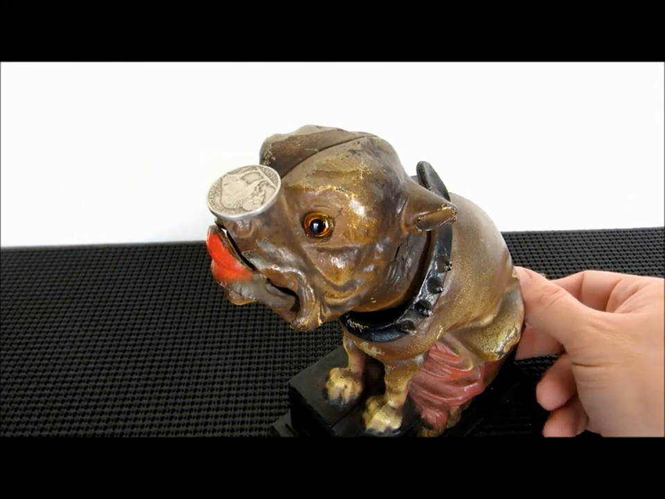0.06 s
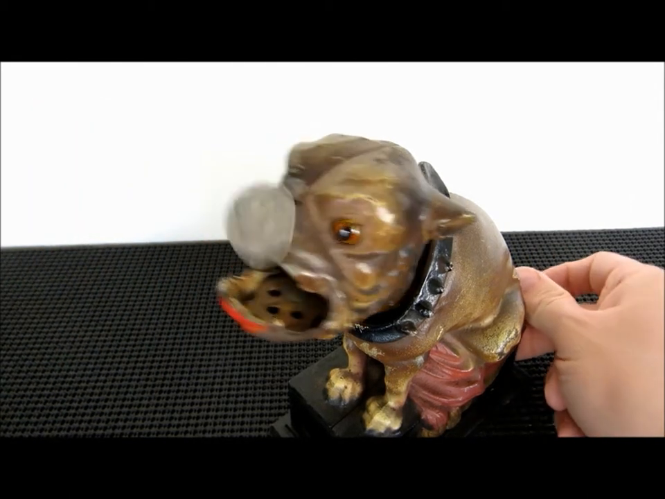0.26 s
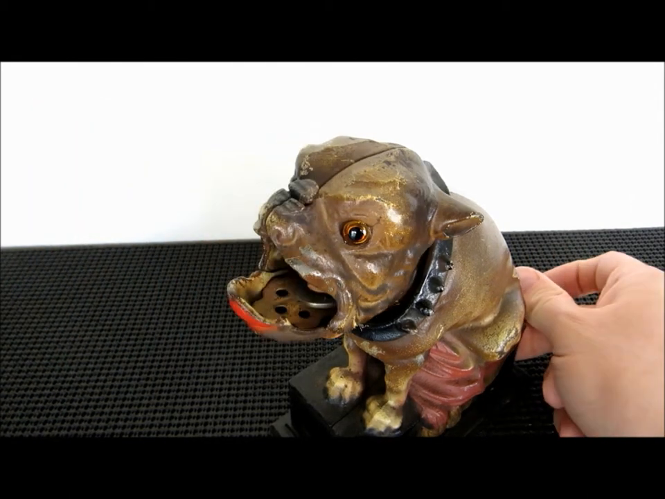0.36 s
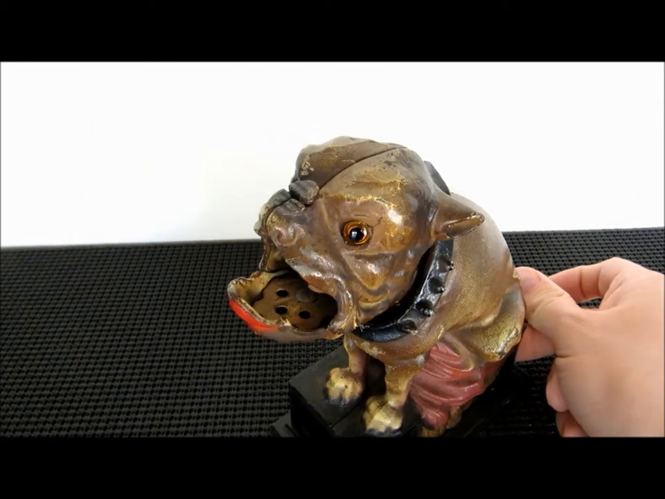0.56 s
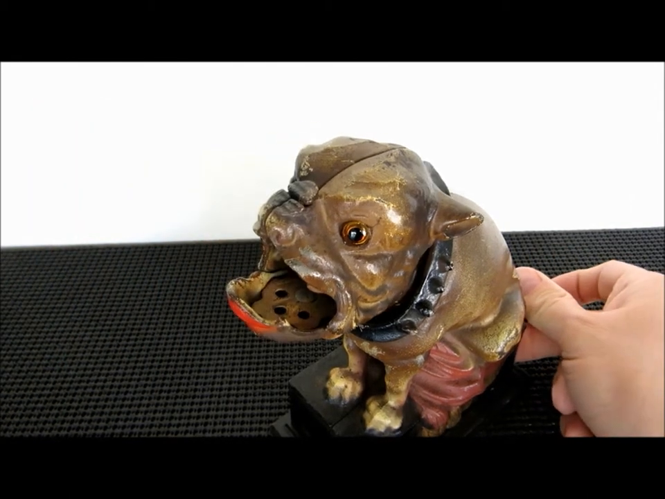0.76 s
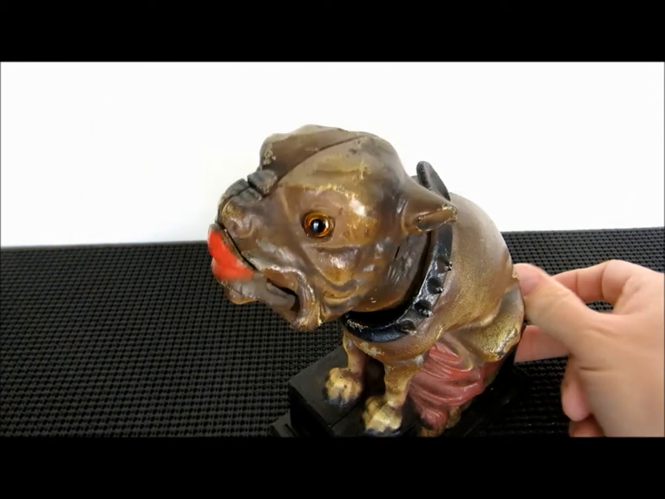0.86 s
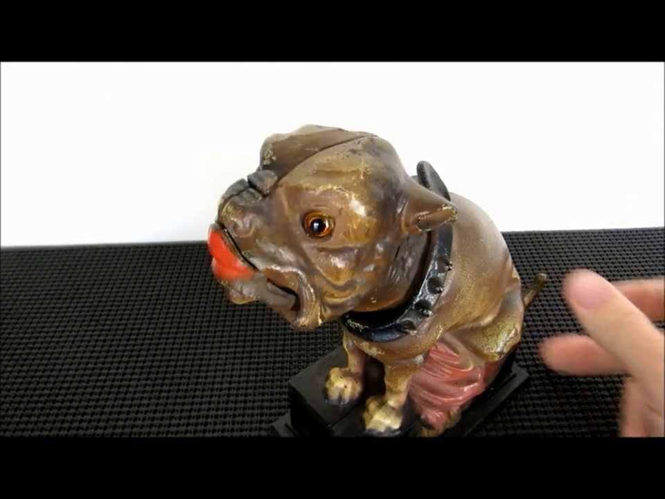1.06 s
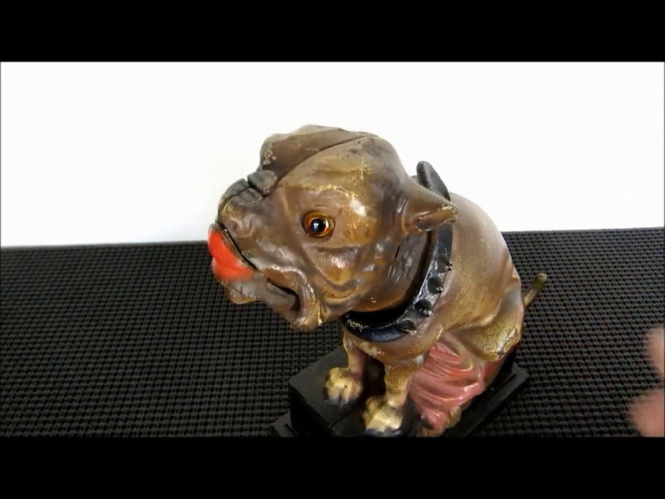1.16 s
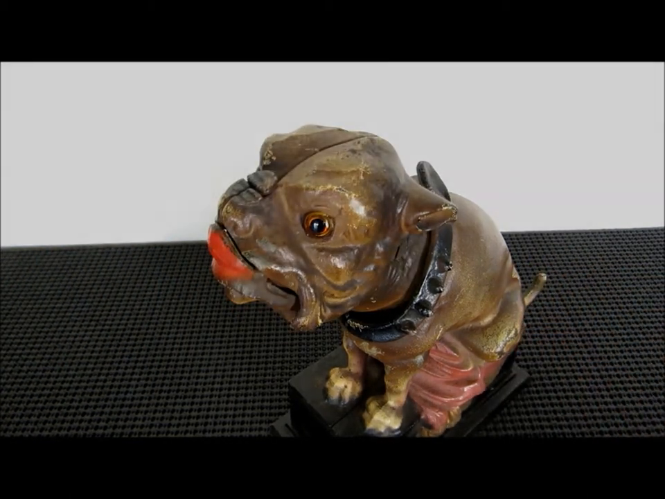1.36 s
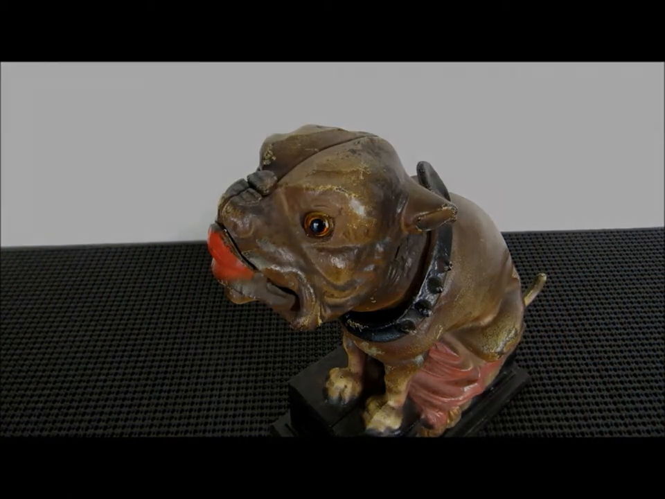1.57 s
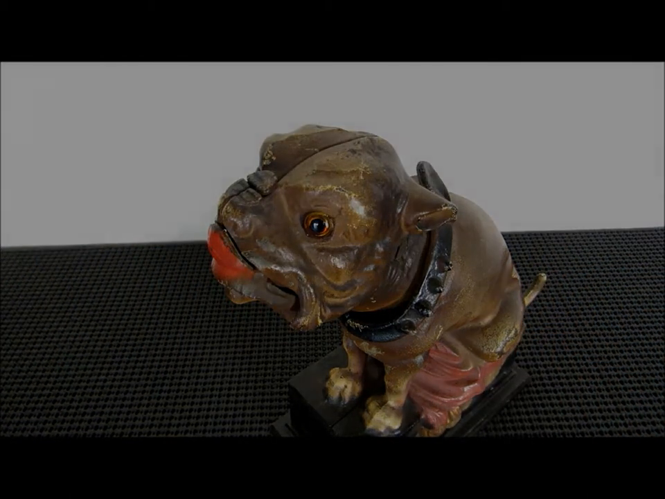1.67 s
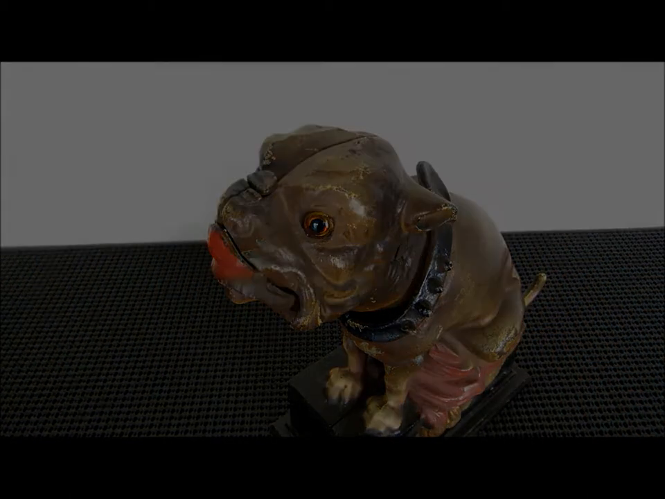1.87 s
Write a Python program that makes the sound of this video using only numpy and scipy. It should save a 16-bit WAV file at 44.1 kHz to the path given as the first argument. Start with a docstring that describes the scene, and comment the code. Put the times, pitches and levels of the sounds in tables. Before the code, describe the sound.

A cast iron toy bank clacks open, a coin clatters inside, and its jaw shuts.

```python
"""A light tap, then the jaw of a cast iron toy bank grinds open and knocks on its stop.
A coin clatters down through the hollow body, and the jaw scrapes shut. Each hit is a short crack
that leaves the iron and the coin ringing; each scrape is a stream of tiny slips.
A hand rustles away. The toy sits on a mat in a small room, close to a stereo microphone,
over a faint hiss and an electrical whine."""
import sys
import numpy as np
from scipy import signal
from scipy.fft import irfft
from scipy.io import wavfile

SR = 44100
rng = np.random.default_rng(int(sys.argv[2]) if len(sys.argv) > 2 else 0)


def master_out(mix):
    """Clip the mix to full scale and print it as 16-bit PCM to the path in sys.argv[1]."""
    frames = np.transpose(np.atleast_2d(mix))
    ceiling = np.clip(frames, -1, 1)
    pcm = np.round(ceiling * 32767).astype(np.int16)
    wavfile.write(sys.argv[1], SR, pcm)


N = 83790
TIME = np.arange(N) / SR

# Five pitch bands, bass to treble. Each row: low edge in Hz, high edge in Hz.
BANDS = [(150, 600), (600, 1600), (1600, 4500), (4500, 9000), (9000, 17000)]
# Jaw and lever knocks. Each row: start in seconds, fade time in seconds, five band levels in dB.
JAW_KNOCKS = [(0.122, 0.0057, -65, -46, -52.5, -57.5, -59), (0.228, 0.004, -60.5, -41.5, -37.5, -49.5, -62),
              (0.2328, 0.007, -49.5, -25.5, -23.5, -32.5, -56), (0.2552, 0.0035, -62, -25, -41, -38, -42),
              (0.2649, 0.0047, -61, -35.5, -26, -31, -40.5), (0.2696, 0.0046, -65.5, -27, -19, -31.5, -37),
              (0.3, 0.0076, -53.5, -34, -25, -26.5, -29.5), (0.305, 0.0063, -50, -25, -24.5, -23.5, -43.5),
              (0.3165, 0.01, -38.5, -32, -27.5, -26.5, -32.5),
              (0.3461, 0.0057, -33, -28.5, -34, -32, -46.5), (0.3678, 0.0043, -29, -21.5, -36, -47, -45),
              (0.8757, 0.02, -57, -34, -35, -31.5, -36.5), (0.899, 0.009, -51, -34.5, -29.5, -46, -55),
              (0.9216, 0.0069, -52.5, -30, -22.5, -24, -28), (0.9661, 0.0079, -67, -80, -36, -36.5, -47)]
# The coin hits the iron. Each row: start in seconds, fade time in seconds,
# main ringing pitch in Hz, its level in dB, five band levels in dB.
COIN_HITS = [(0.384, 0.0025, 5490, -12, -58, -43.5, -35, -18, -25.5),
             (0.3873, 0.0032, 7330, -12.5, -55, -48.5, -39, -18.5, -24.5),
             (0.3957, 0.0092, 5440, -21, -53, -53, -31.5, -43, -31.5),
             (0.409, 0.0083, 5370, -23, -57, -49.5, -34, -32, -33.5),
             (0.435, 0.0017, 5440, -27, -65, -46, -38.5, -46.5, -45),
             (0.4454, 0.0013, 5650, -41, -60, -53, -36.5, -27.5, -39),
             (0.453, 0.0052, 5600, -15.5, -60, -45.5, -38.5, -26, -27),
             (0.4816, 0.0039, 7870, -23, -50, -63, -43.5, -25.5, -27),
             (0.4928, 0.0027, 8000, -23, -52.5, -42, -28.5, -25, -38),
             (0.539, 0.0024, 7970, -27.5, -48, -39, -36, -53.5, -45.5),
             (0.573, 0.0037, 6000, -21.5, -51, -46.5, -32, -25, -32.5),
             (0.579, 0.0073, 8190, -20, -53.5, -36, -36, -26, -28.5),
             (0.61, 0.0055, 3743, -29, -58, -38, -43, -34.5, -40.5),
             (0.621, 0.0053, 3620, -36, -74.5, -44.5, -35.5, -26, -30.5),
             (0.6394, 0.0098, 7650, -30.5, -61.5, -44, -34.5, -30.5, -33.5),
             (0.7152, 0.002, 3954, -15, -37.5, -37, -17.5, -13.5, -26),
             (0.7385, 0.0067, 5810, -14, -60, -46, -34, -23, -26.5),
             (0.754, 0.0064, 7180, -25, -66.5, -52.5, -39, -29, -33.5),
             (0.7754, 0.0055, 5850, -20, -62, -55, -52, -33, -30.5),
             (0.8101, 0.0051, 6130, -15.5, -45.5, -37.5, -23, -15.5, -21.5),
             (0.8612, 0.014, 7140, -24, -52.5, -43, -36, -32, -29.5)]
# The notes each object rings with. Each row: pitch in Hz, level in dB compared with the hit.
BODY_NOTES = [(280, -9), (443, -15), (741, -17), (780, -18), (1108, -15), (1189, -21), (1844, -21),
              (2116, -22), (2308, -19), (2808, -25), (3424, -27), (3666, -20), (3968, -24), (4354, -22),
              (5965, -23), (6973, -24), (7219, -24)]
COIN_NOTES = [(5432, -26), (5652, -26), (5823, -24), (9010, -20), (11590, -22)]
# Hums after heavy hits. Each row: start in seconds, pitch in Hz, level in dB, ring time in seconds.
# A ring time is how long a sound takes to drop by 60 dB.
BODY_HUMS = [(.3685, 778, -21, .06), (.8102, 770, -30, .07), (.9218, 655, -43, .35), (.9218, 688, -42, .3)]
# The tone colour of each noise. Each row: frequency in Hz, relative strength in dB.
JAW_COLOUR = [(135, -30.5), (175, -6.5), (270, 0), (335, -13), (440, 0.5), (540, -4), (800, -4.5),
              (1120, 4.5), (1450, -1.5), (2100, 0), (2600, -2), (3600, -0.5), (4500, -1.5), (7800, -1.5),
              (9500, -8), (16000, -12.5)]
COIN_COLOUR = [(135, -19.5), (250, -11), (340, -15.5), (560, -17), (760, -5.5), (1400, -3), (2300, -3.5),
               (3050, -2), (3750, 4), (4400, -0.5), (5800, 0), (6500, -0.5), (7500, -3.5), (9500, -8),
               (12200, -13.5), (16000, -24.5)]
RUSTLE_COLOUR = [(100, -21), (400, 7.5), (1200, -5.5), (3500, -2), (15000, -20)]
HISS_COLOUR = [(15, -32.5), (25, -11), (66, -3), (98, -7.5), (529, -4.5), (856, -2.5), (6540, -18),
               (15000, -29)]
# How the longer sounds swell and fade. Each row: time in seconds, level in dB.
JAW_OPENS = [(.233, -37), (.25, -26.5), (.28, -23), (.325, -22), (.345, -30), (.38, -28), (.40, -55)]
JAW_SHUTS = [(.86, -34), (.88, -34), (.905, -29.5), (.935, -37.5), (.97, -37), (.99, -44.5), (1.06, -61)]
COIN_SLIDES = [(.40, -43), (.505, -35), (.535, -32.5), (.565, -47), (.63, -33), (.70, -50), (.76, -36),
               (.85, -41.5)]
SING_LEVEL = [(.383, -45), (.39, -37.5), (.475, -34), (.525, -54), (.585, -49), (.7, -40), (.84, -49.5),
              (.9, -41), (1.02, -67)]
SHIMMER_LEVEL = [(.385, -42), (.455, -38.5), (.51, -53.5)]
RUSTLE_LEVEL = [(1.30, -70), (1.35, -51.5), (1.39, -48), (1.41, -57.5)]
HISS_LEVEL = [(0, -44), (.4, -43.5), (1.25, -56), (1.45, -50.5), (1.9, -49.5)]
# Timing between the two sides. Each row: frequency in Hz, how far the left leads in radians.
MIC_PHASE = [(60, -9), (260, -3.5), (1550, -1.0), (5000, -0.64), (15000, 0.5)]
# Left-right balance. Each row: frequency in Hz, how much louder the left is in dB.
MIC_BALANCE = [(60, 3.2), (220, 11), (700, 9.6), (2400, 5), (8000, 1.5), (15000, 2.3)]
HISS_BALANCE = [(60, 6), (240, 2), (15000, -1.5)]
# Length of the room's echo. Each row: frequency in Hz, ring time in seconds.
ROOM_RING = [(200, 0.33), (1550, 0.82), (10000, 0.1)]
# Strength of the echo. Each row: frequency in Hz, level in dB.
ROOM_LEVEL = [(200, -16), (1000, -13.5), (4000, -12.5), (14000, -8)]
# Width of the hiss. Each row: frequency in Hz, how alike the sides are (1 same, -1 opposite).
HISS_LIKENESS = [(60, -0.8), (240, -0.92), (950, -0.86), (3770, -0.77), (15000, 0.11)]
# Electrical tones. Each row: pitch in Hz, level in dB, flutter depth (0 is steady).
WHINE_TONES = [(70, -75, .6), (1630, -73, 1.5), (2170, -72, .8), (2239, -63.5, .5), (7866, -67, .08),
               (15735, -71, .08)]
# The whine's slow drift. Each row: time in seconds, change of level in dB.
WHINE_DRIFT = [(0, 0), (.4, -3), (1.9, 1)]

BODY_TRIM_DB, BODY_RING_S = -1.5, .16  # a trim is added to the level of every note
COIN_TRIM_DB, COIN_RING_S = -1, .12
ATTACK_CYCLES = 1.14  # a hit builds up over about one vibration


def jaw():
    """The hinged jaw grinds and knocks as it opens and shuts; each knock rings it briefly."""
    out = scrape(JAW_OPENS, JAW_COLOUR) + scrape(JAW_SHUTS, JAW_COLOUR)
    notes = ringing(BODY_NOTES, BODY_TRIM_DB, BODY_RING_S)
    for start, fade_s, *band_db in JAW_KNOCKS:
        knock = hit(fade_s, band_db, JAW_COLOUR, notes)
        jaw_ring = ring(hz=1092, db=band_db[1] - 3.5, ring_s=.03)
        add(out, start, knock + jaw_ring)
    return out


def coin():
    """The coin slides and bounces down inside; each spot it hits has one main note."""
    out = scrape(COIN_SLIDES, COIN_COLOUR) + coin_song()
    notes = ringing(BODY_NOTES, BODY_TRIM_DB, BODY_RING_S)
    notes += ringing(COIN_NOTES, COIN_TRIM_DB, COIN_RING_S)
    for start, fade_s, hz, db, *band_db in COIN_HITS:
        add(out, start, hit(fade_s, band_db, COIN_COLOUR, notes) + ring(hz, db, ring_s=.029))
    return out


def coin_song():
    """The coin's two highest notes flutter as it turns and touches the walls."""
    out = np.zeros((2, N))
    for hz, points, flutter_hz in [(13850, SING_LEVEL, 60), (12320, SHIMMER_LEVEL, 260)]:
        tone = fluttering_tone(hz, depth=3, rate_hz=flutter_hz)
        out += level(points) * (microphones(hz)[:, None] * tone).real
    return out


def body_hum():
    """Heavy hits set the hollow body humming briefly."""
    out = np.zeros((2, N))
    for start, hz, db, ring_s in BODY_HUMS:
        add(out, start, ring(hz, db, ring_s))
    return out


def hit(fade_s, band_db, colour, notes, crack_s=.0072, spread_db=4.5):
    """Metal strikes metal: a quick crack, then ringing notes."""
    t = np.arange(SR // 8) / SR
    out = np.zeros((2, SR // 2))
    centres = np.sqrt(np.prod(BANDS, 1))
    for band, hz, db in zip(BANDS, centres, band_db):
        band_fade_s = fade_s * (centres[-2] / hz) ** .16  # lower bands last longer
        attack = 1 - np.exp(-t * hz / ATTACK_CYCLES)
        crack = iron_noise(len(t), colour, band) * attack * np.exp(-t / band_fade_s)
        opening_strength = np.sqrt(np.mean(crack[:, t < crack_s] ** 2))
        add(out, 0, amp(db) * crack / opening_strength)
    for hz, db, ring_s in notes:
        spot_db = spread_db * rng.standard_normal()  # each spot favours different notes
        hit_db = np.interp(np.log(hz), np.log(centres), band_db)
        out += ring(hz, db + spot_db + hit_db, ring_s)
    return out


def scrape(points, colour, slips_per_s=1100, slip_s=.002):
    """Sliding metal makes many tiny slips, and each one shakes the iron."""
    sizes = amp(np.minimum(rng.exponential(1, N), 4))
    slips = sizes * (rng.random(N) < slips_per_s / SR)
    power = signal.lfilter([1], [1, -np.exp(-1 / (slip_s * SR))], slips ** 2)  # each slip fades
    all_bands = (BANDS[0][0], BANDS[-1][1])
    return level(points) * unit(np.sqrt(power) * iron_noise(N, colour, all_bands))


def ring(hz, db, ring_s):
    """One pure note dies away at both microphones."""
    t = np.arange(SR // 2) / SR
    wave = (microphones(hz)[:, None] * np.exp(2j * np.pi * (hz * t + rng.random()))).real
    attack = 1 - np.exp(-t * hz / ATTACK_CYCLES)
    return np.sqrt(2) * wave * amp(db - 60 * t / ring_s) * attack


def ringing(notes, trim_db, ring_s):
    """Gives all the notes of one object the same trim and ring time."""
    return [(hz, db + trim_db, ring_s) for hz, db in notes]


def iron_noise(size, colour, band):
    """The iron's many overlapping vibrations blur into noise."""
    return noise(size, colour, lambda hz: .96, lambda hz: microphones(hz) * body_boost(hz), band)


def body_boost(hz, boost_db=5.5, width_hz=22.2):
    """The body strengthens every crack and scrape near its own notes."""
    nearness = sum(1 / (1 + ((hz - centre) / width_hz) ** 2) for centre, _ in BODY_NOTES)
    return amp(boost_db * np.minimum(nearness, 1))


def hand():
    """A soft rustle as the hand draws away from the lever."""
    return level(RUSTLE_LEVEL) * noise(N, RUSTLE_COLOUR, lambda hz: .5, microphones)


def room(sound, gap_s=.011):
    """The walls send back a blur of echoes whose treble dies first."""
    hz, t, spectrum = signal.stft(rng.standard_normal((2, SR // 2)), SR, nperseg=256)
    ring_s = at_pitch(ROOM_RING, hz)[:, None]
    spectrum *= amp(at_pitch(ROOM_LEVEL, hz)[:, None] - 60 * t / ring_s)
    spectrum *= np.sqrt(2 * np.log(1000) / (ring_s * SR))  # a longer echo gets no extra energy
    tail = signal.istft(spectrum, SR, nperseg=256)[1]
    tail *= np.clip(np.arange(tail.shape[1]) / SR / gap_s - .5, 0, 1)  # echoes arrive a little late
    return signal.fftconvolve(sound, tail, axes=1)[:, :N]


def hiss():
    """A faint, wide hiss lies under everything."""
    def sides(hz):
        return amp(np.outer([.5, -.5], at_pitch(HISS_BALANCE, hz)))
    return level(HISS_LEVEL) * noise(N, HISS_COLOUR, lambda hz: at_pitch(HISS_LIKENESS, hz), sides)


def whine():
    """Thin electrical tones: the low ones flutter, the high ones are nearly steady."""
    tones = sum(amp(db) * fluttering_tone(hz, depth, rate_hz=35).real for hz, db, depth in WHINE_TONES)
    return level(WHINE_DRIFT) * tones


def microphones(hz):
    """Strength and phase of the toy's sound on the left and right, as complex numbers."""
    left = amp(at_pitch(MIC_BALANCE, hz))
    right = np.exp(-1j * at_pitch(MIC_PHASE, hz))
    return np.array([left, right]) / np.sqrt((1 + left ** 2) / 2)


def fluttering_tone(hz, depth, rate_hz):
    """A tone, as complex numbers, whose strength and phase wobble at random."""
    slow = np.exp(-(np.fft.fftfreq(N, 1 / SR) / rate_hz) ** 2)
    wobble = np.fft.ifft(slow * np.exp(2j * np.pi * rng.random(N)))
    flutter = 1 + depth * wobble / np.std(wobble)
    return np.sqrt(2 / (1 + depth ** 2)) * flutter * np.exp(2j * np.pi * hz * TIME)


def noise(size, colour, likeness, sides, band=None):
    """Stereo noise: likeness says how alike left and right are, sides gives each its gain."""
    hz = np.fft.rfftfreq(size, 1 / SR)
    left, other = np.exp(2j * np.pi * rng.random((2, len(hz))))
    same = np.clip(likeness(hz), -1, 1)
    right = same * left + np.sqrt(1 - same ** 2) * other
    spectrum = np.array([left, right]) * sides(hz) * amp(at_pitch(colour, hz))
    if band:
        spectrum /= np.sqrt((1 + (band[0] / (hz + 1)) ** 8) * (1 + (hz / band[1]) ** 12))
    return unit(irfft(spectrum, size))


def amp(db):
    """Turns decibels into a gain to multiply by."""
    return 10 ** (np.asarray(db) / 20)


def unit(sound):
    """Scales a sound to an average strength (rms) of 1."""
    return sound / np.sqrt(np.mean(sound ** 2) + 1e-20)


def at_pitch(points, hz):
    """Looks up a frequency in a table, gliding between rows on a log scale."""
    row_hz, value = np.transpose(points)
    return np.interp(np.log(hz + 1), np.log(row_hz + 1), value)


def level(points):
    """Gain over time from a level table, silent before and after it."""
    return amp(np.interp(TIME, *np.transpose(points), left=-140, right=-140))


def add(mix, start_s, sound):
    """Mixes in a stereo sound at its start time."""
    part = mix[:, round(start_s * SR):][:, :sound.shape[1]]
    part += sound[:, :part.shape[1]]


def scene():
    """The toy, its echo, the hand and the background."""
    bass_cut = signal.butter(2, 150.8, "high", fs=SR, output="sos")  # a small body gives off little bass
    toy = signal.sosfilt(bass_cut, jaw() + coin() + body_hum())
    return toy + room(toy) + hand() + hiss() + whine()


def record(dry):
    """Clips any peak beyond full scale, then cuts the treble above 15900 Hz."""
    treble_cut = signal.firwin(255, 15900, window=("kaiser", 7), fs=SR)
    return signal.oaconvolve(np.clip(dry, -1, 1), treble_cut[None], "same")


dry = scene()
out = record(dry)
master_out(out)
```